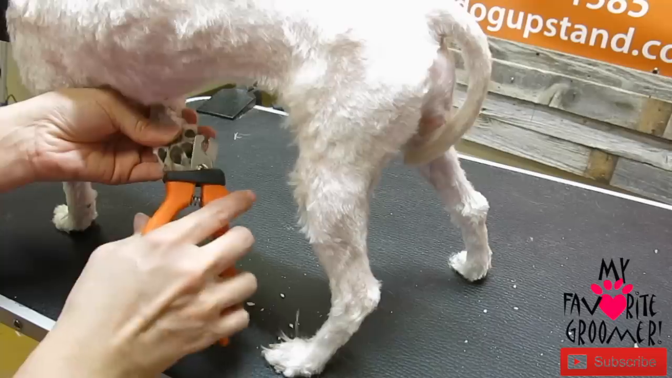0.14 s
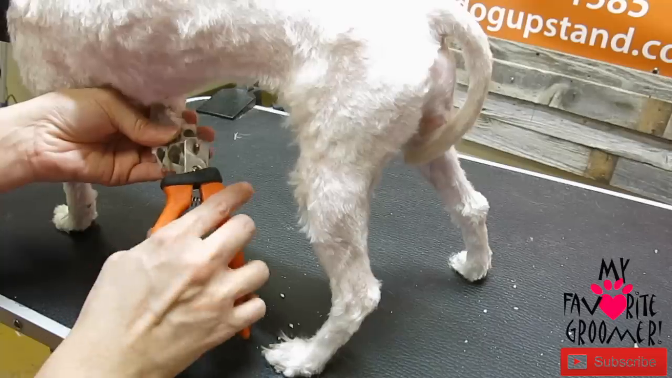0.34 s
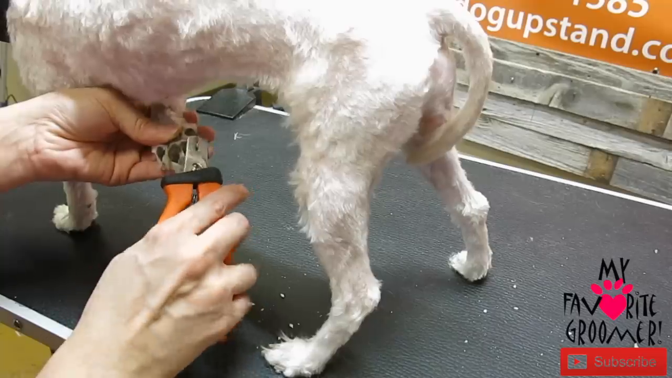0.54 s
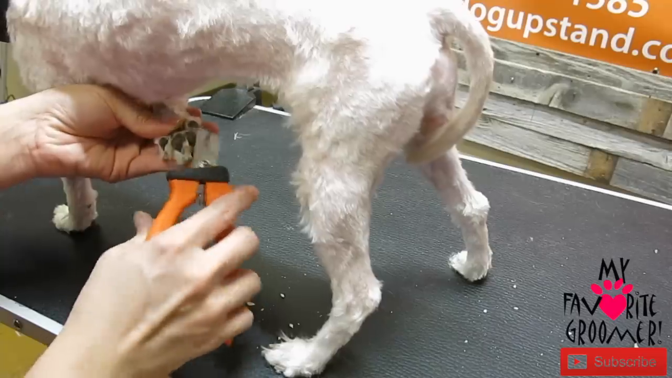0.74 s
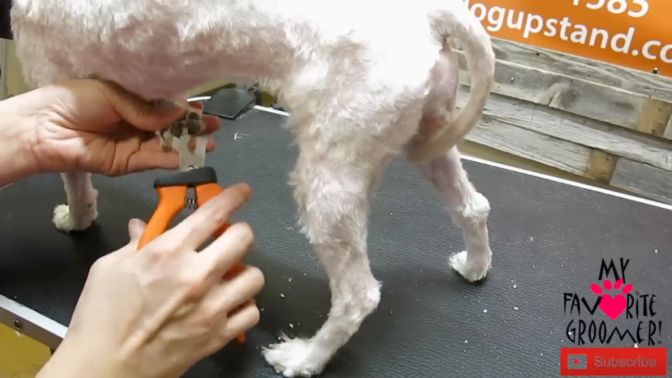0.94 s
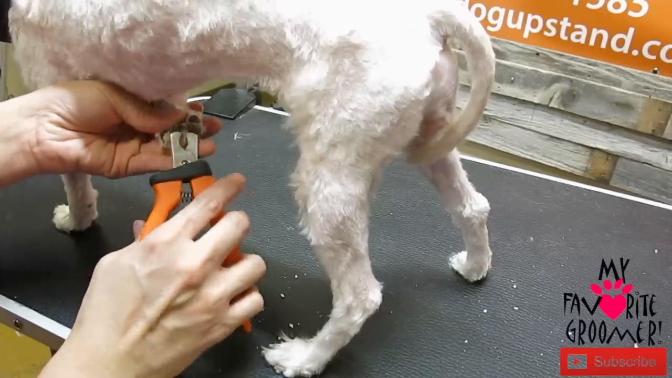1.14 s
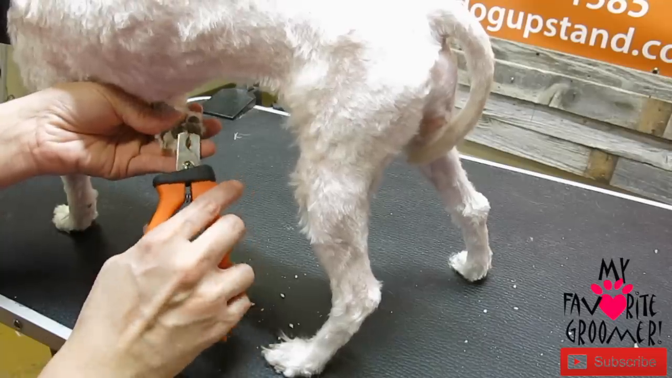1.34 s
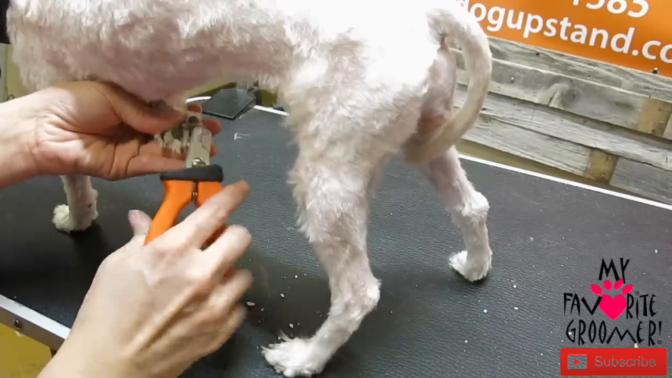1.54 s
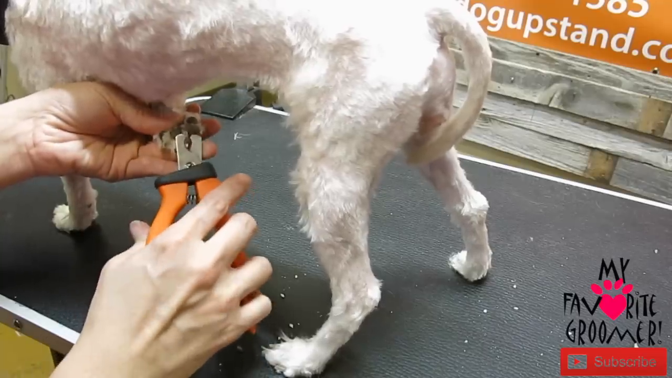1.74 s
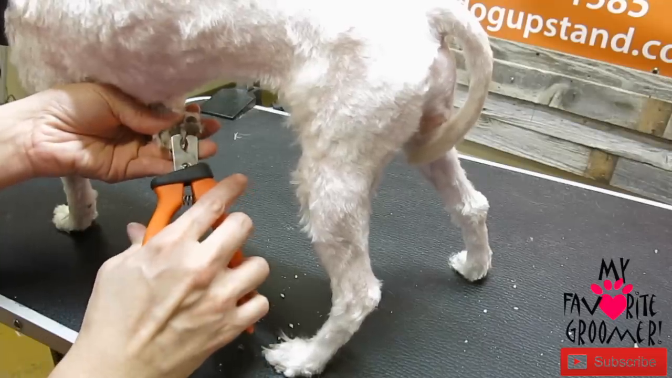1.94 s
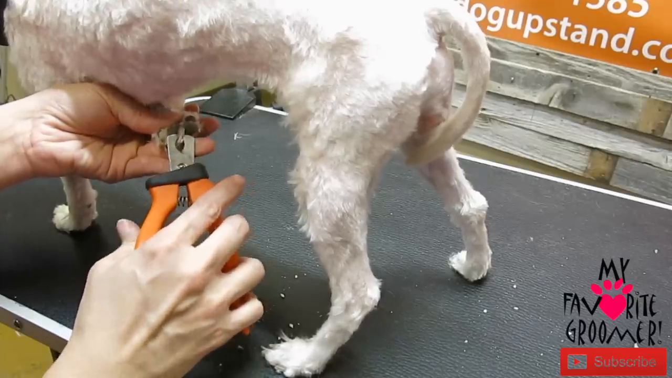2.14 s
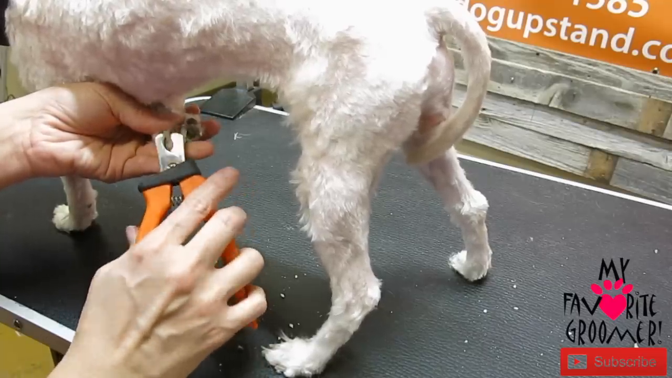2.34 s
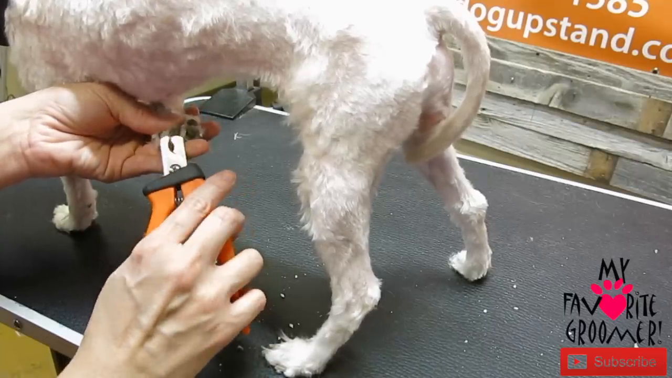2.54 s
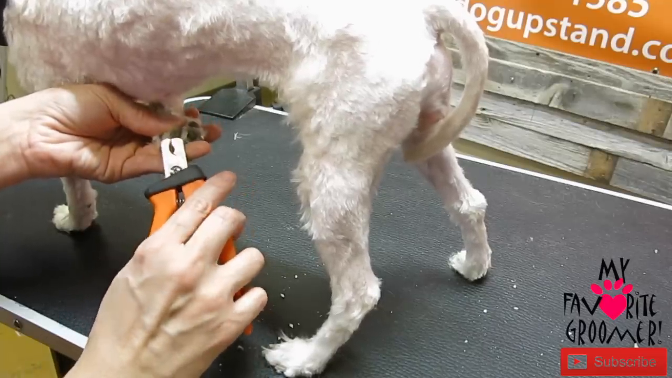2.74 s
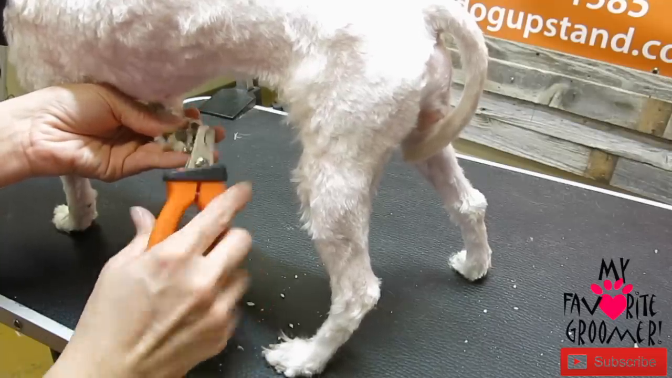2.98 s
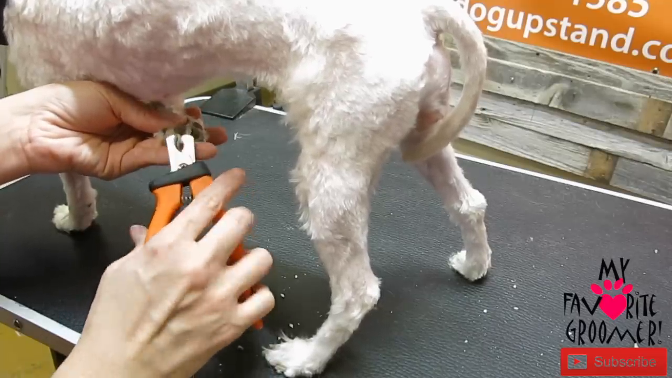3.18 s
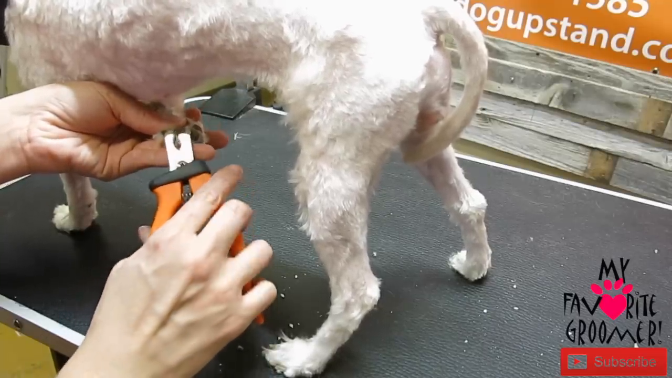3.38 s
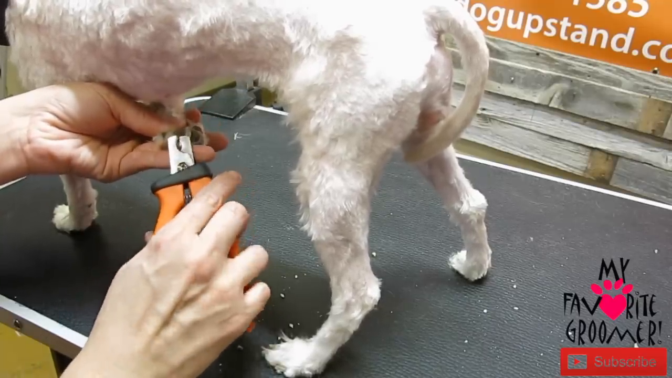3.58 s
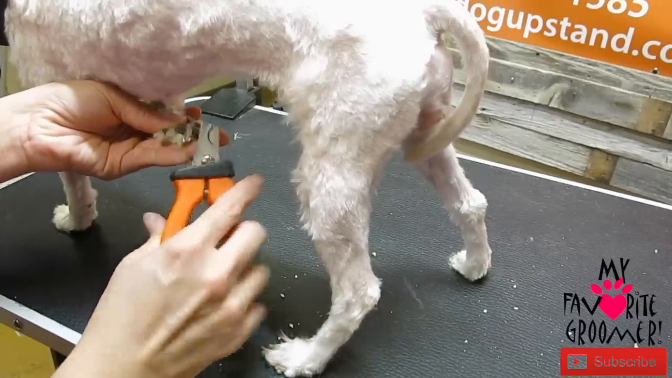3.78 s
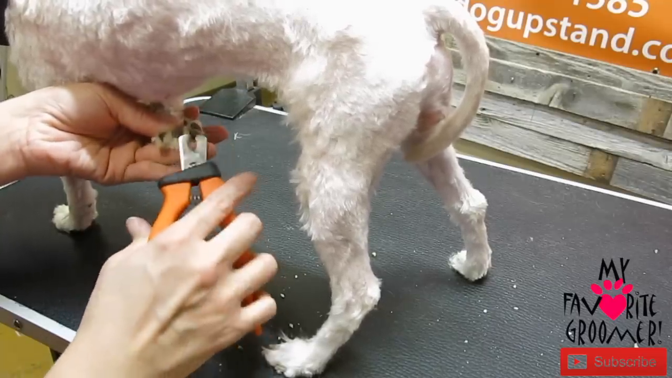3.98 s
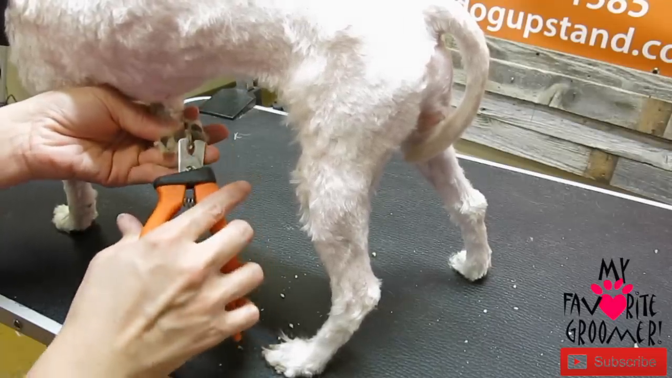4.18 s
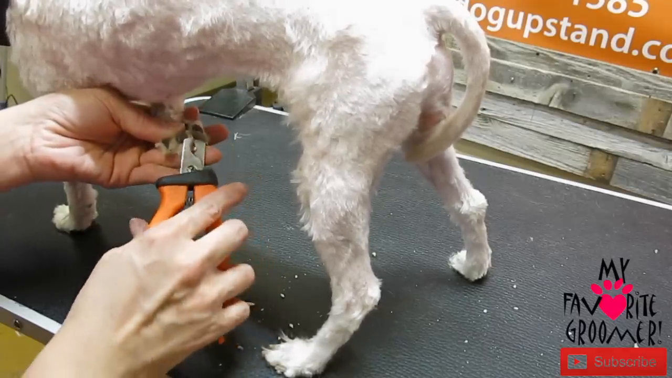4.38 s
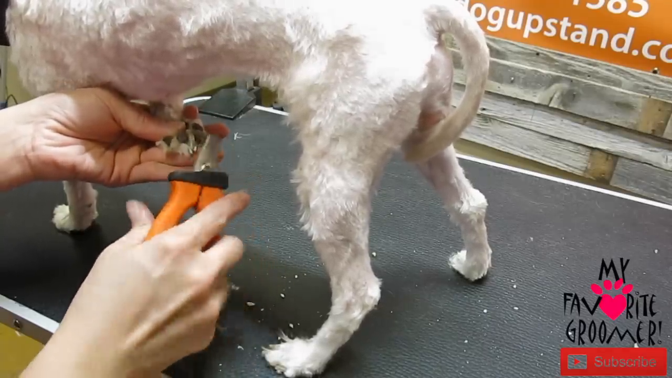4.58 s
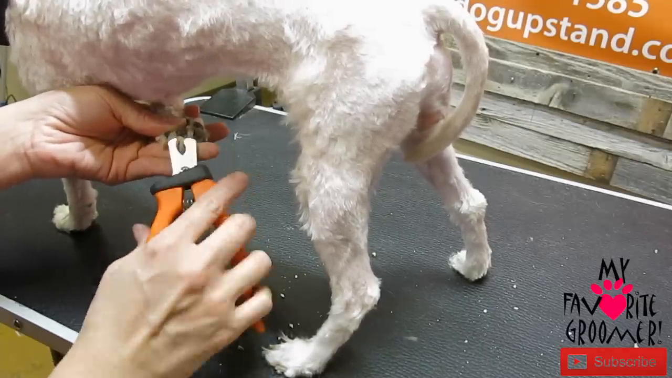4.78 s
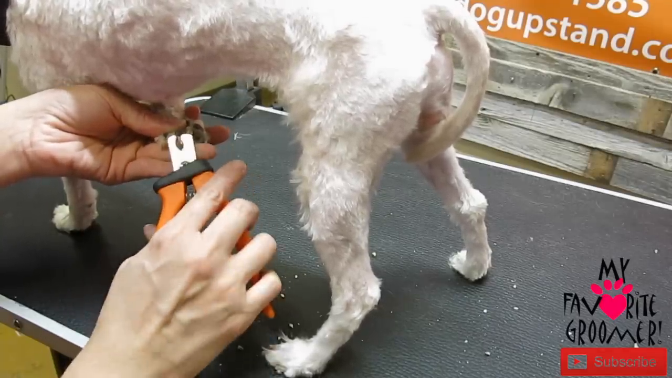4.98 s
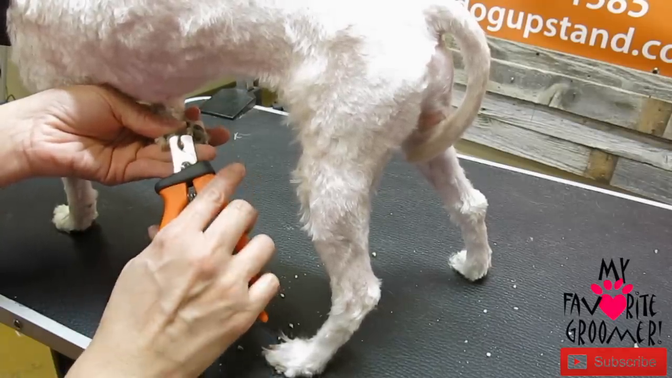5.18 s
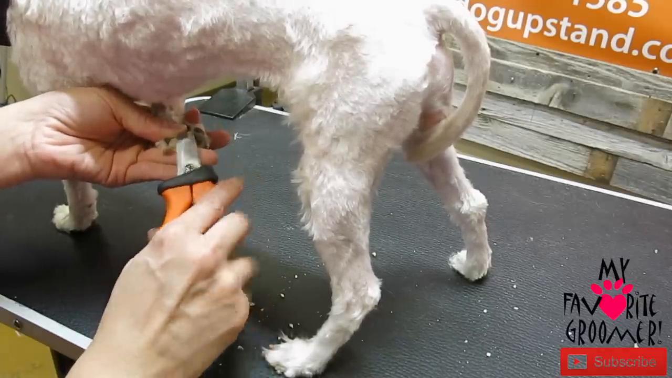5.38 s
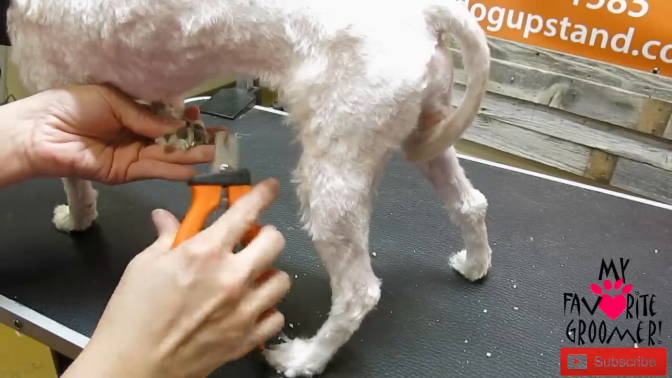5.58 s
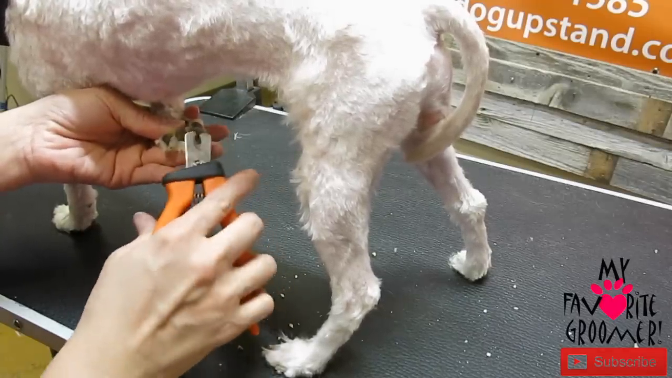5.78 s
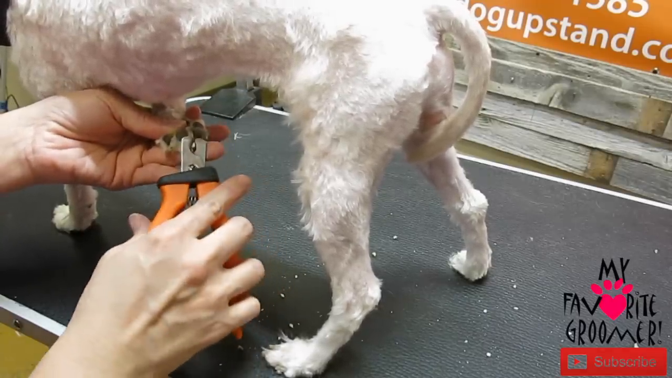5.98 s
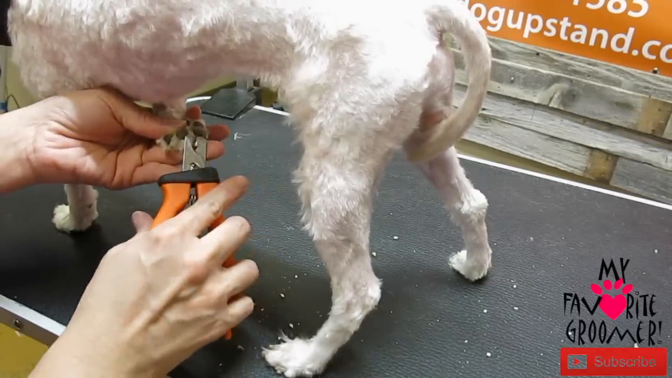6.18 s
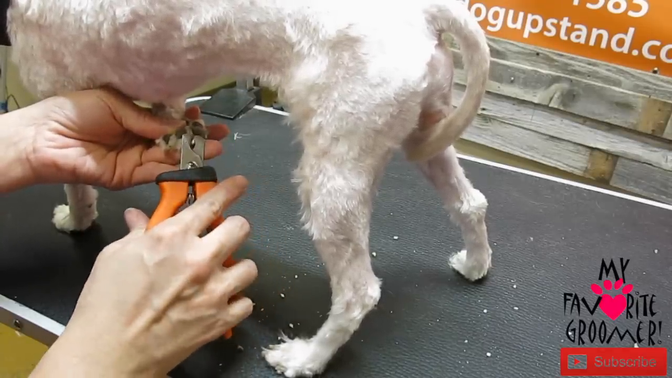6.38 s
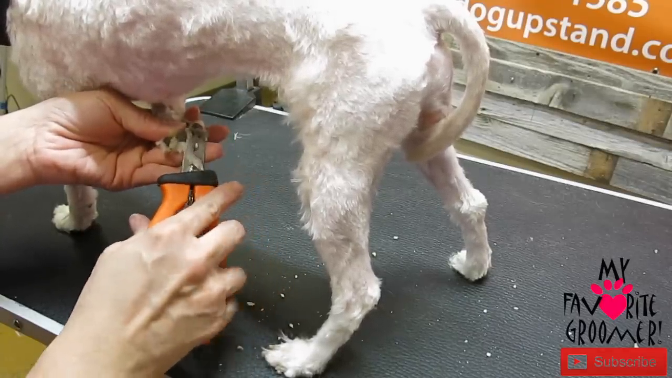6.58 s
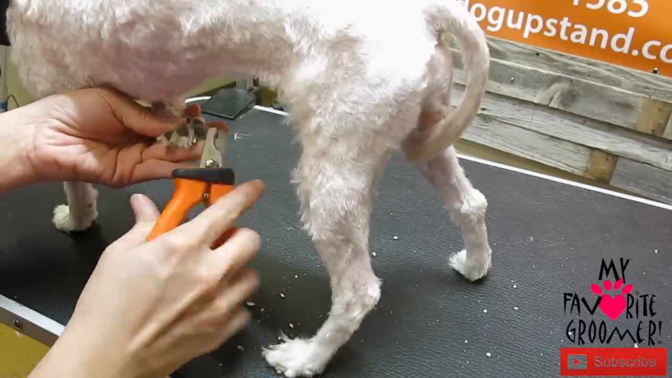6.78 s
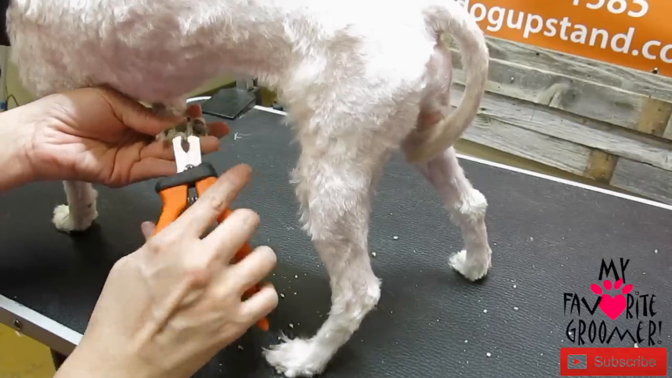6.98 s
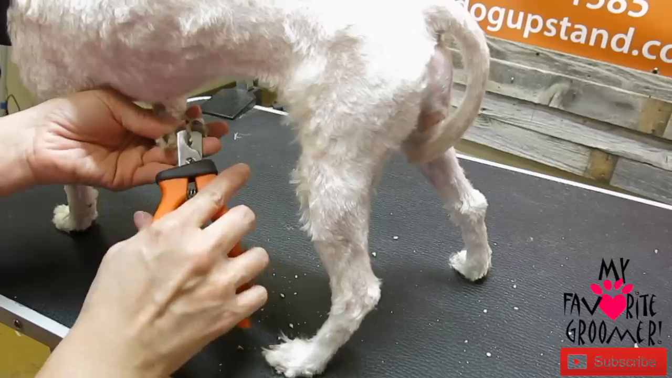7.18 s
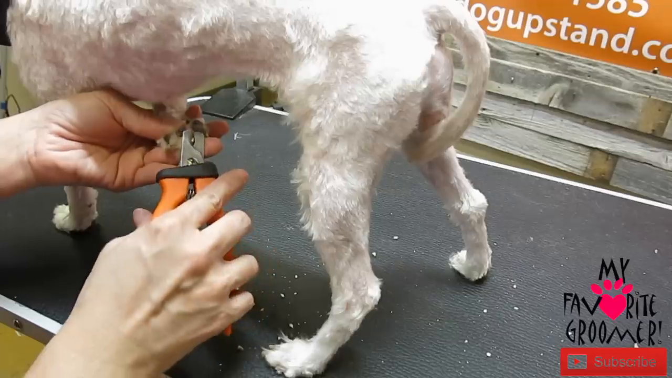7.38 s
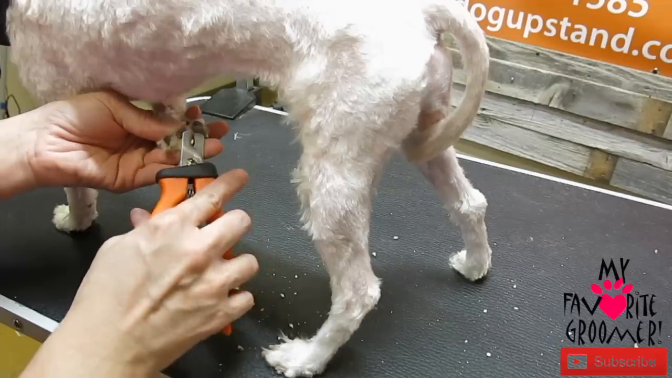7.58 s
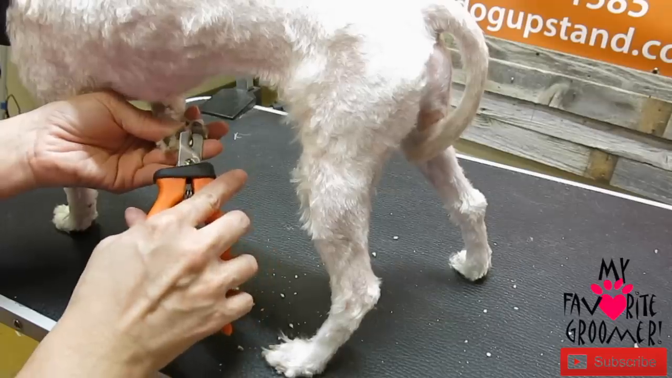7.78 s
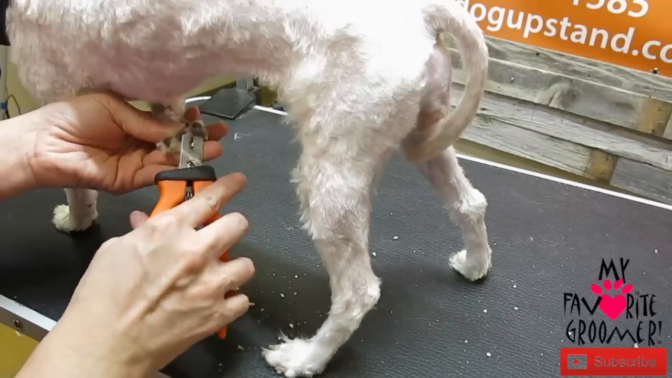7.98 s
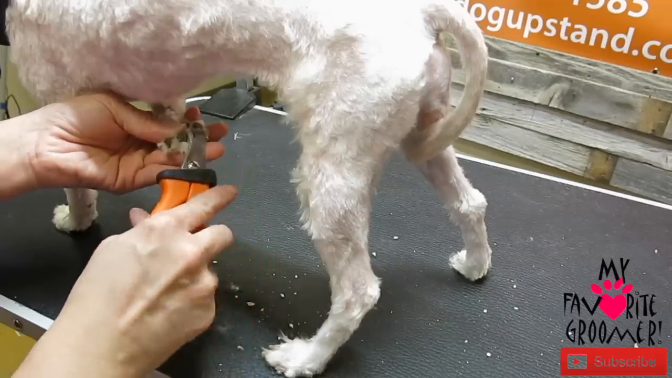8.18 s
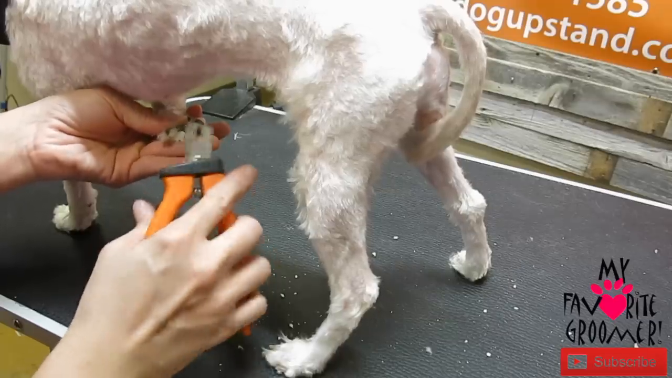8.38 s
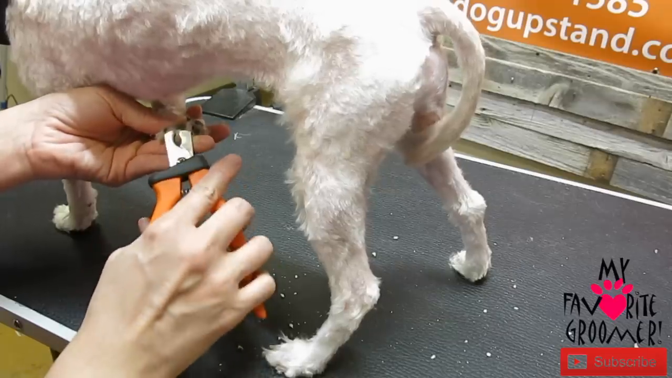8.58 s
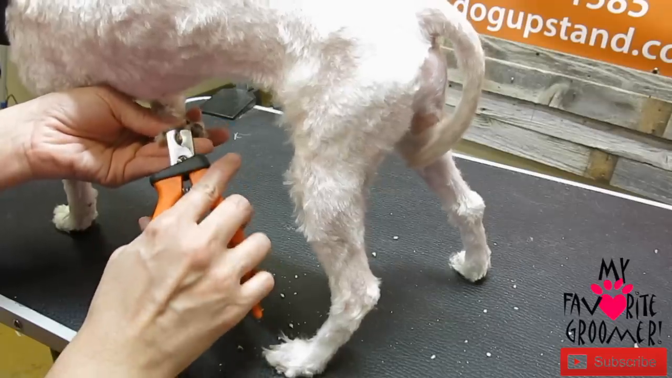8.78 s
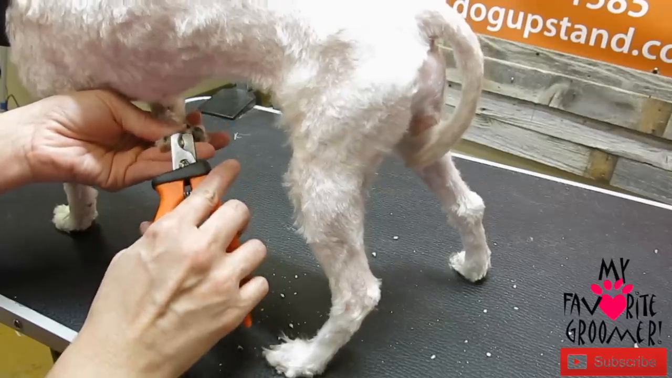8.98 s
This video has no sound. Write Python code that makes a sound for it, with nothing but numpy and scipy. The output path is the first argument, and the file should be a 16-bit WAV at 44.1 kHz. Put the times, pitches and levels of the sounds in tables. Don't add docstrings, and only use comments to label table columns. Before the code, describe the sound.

A close stereo microphone in a small, hard-walled room hears steel plier clippers cutting a dog's nails. A snap lands immediately at 0 s, then a softer double click at 0.6, a firm one at 1.5, the loudest and brightest crack at 2.9, a firm snap with a hard handle knock at 3.7, a duller double knock at 4.5, then snaps at 5.5, 6.7 and a fainter crack with a clear blade clap at 8.2. Tiny creaks lead into cuts; spring ticks follow about a quarter second later. A barely audible dull scrape passes near 7. Each hit has a small thud and short room ring. Underneath, mains hum, a slowly rising motor tone strongest near 1.4, 3.3 and 5.8, intermittent low drone, muffled vehicles swelling near 0.9 and 3.3, and soft ventilation continue to 9 s, ducking after snaps and creeping back.

```python
import sys
import numpy as np
from scipy import signal
from scipy.fft import rfft, irfft, next_fast_len
from scipy.io import wavfile
from scipy.ndimage import uniform_filter1d

SR = 44100
rng = np.random.default_rng(int(sys.argv[2]) if len(sys.argv) > 2 else 0)


def unload_audio(sound):
    columns = np.transpose(np.atleast_2d(sound))
    steps = np.round(np.clip(columns, -1, 1) * 32767)
    wavfile.write(sys.argv[1], SR, steps.astype(np.int16))


def linear_from_db(decibels):
    return 10 ** (np.asarray(decibels, float) / 20)


N = 398223

# t/s, tone level/dB
MOTOR_LOAD = [(0, -54), (.9, -58.5), (1.2, -44.5), (1.45, -42), (1.7, -53), (2.3, -63), (2.8, -55.5),
              (3.3, -39), (4.3, -49), (5.2, -50), (5.8, -40), (6.6, -47), (7.2, -50), (8.1, -49),
              (9.03, -53)]


def clippers(unlike=0.091, crest_db=7.0, lag_s=.000024):
    # f/Hz, width/Hz, level/dB
    nail_modes = [(1377, 680, -9), (1880, 580, 0.5), (2690, 730, -4)]
    # f/Hz, width/Hz, level/dB
    handle_modes = [(3800, 1700, -12), (4620, 450, 0.5), (5150, 760, -0.5), (6270, 1600, -1.5),
                    (7996, 1000, -2)]
    # f/Hz, width/Hz, level/dB
    blade_modes = [(8900, 820, -12), (9610, 1200, -1.5), (10630, 490, 1), (11650, 1200, -1),
                   (13500, 1500, -5.5), (14950, 1500, -8)]
    # grind share/0-1, grind time/s, level into the room/dB
    strikes = [(0.7, 0.001, 1.5), (0.4, 0.00088, 3), (0.2, 0.00092, -0.5)]
    sway_db = 1.2
    faint_db, faint_drier_db = -33, -4
    length = 400

    rows, span = contacts(), np.arange(length)
    pans_db = np.clip(sway_db * rng.standard_normal(len(rows)), -3, 3)
    near, spread = np.zeros((2, N + length)), np.zeros(N + length)
    rough = rng.standard_normal((len(rows), 9, length))
    knock = 1. * (span == 2)
    for part, modes in enumerate([nail_modes, handle_modes, blade_modes]):
        grind, grind_s, room_db = strikes[part]
        shared = rough[:, part, None]
        own = rough[:, 3 + 2 * part:5 + 2 * part]
        friction = grind * (shared + unlike * own) * np.exp(-span / SR / grind_s)
        rings = resonate(knock + friction, modes)
        rings /= np.abs(rings).max(axis=2, keepdims=True)
        clean = resonate(knock, modes)
        clean *= linear_from_db(room_db) / np.abs(clean).max()
        for (s, *levels_db), ring, pan_db in zip(rows, rings, pans_db):
            at = round(s * SR)
            gain = linear_from_db(levels_db[part] + crest_db)
            near[:, at:at + length] += gain * ring * linear_from_db(np.array([[.5], [-.5]]) * pan_db)
            drier_db = faint_drier_db * (levels_db[1] < faint_db)
            spread[at:at + length] += gain * clean * linear_from_db(drier_db)

    size = next_fast_len(N + length)
    hz = np.arange(size // 2 + 1) * SR / size
    turn = np.exp(-1j * np.pi * hz * lag_s * np.array([[1], [-1]]))
    return irfft(rfft(near, size) * turn, size)[:, :N], spread[None, :N]


def contacts():
    # t/s, level/dB, brightness/dB, thud f/Hz
    cracks = [
        (.0061, -20, 0, 700),
        (.6263, -25, 0.5, 690),
        (1.4839, -16, 0.5, 500),
        (2.9434, -9, 3.5, 600),
        (3.7042, -14.5, 0, 500),
        (4.5309, -18, -1.5, 550),
        (5.4607, -16, -1, 716),
        (6.6835, -18, -1.5, 454),
        (8.1794, -24, -4, 700),
    ]
    # t/s, level/dB, brightness/dB
    claps = [(.0216, -15, 0.088), (.6525, -18.5, 1.6), (1.4866, -13, 0.37), (2.9462, -22.5, 0),
             (3.7078, -18, 0.13), (5.4636, -17.5, 2.4), (6.6863, -16, 1), (8.1868, -16, 0)]
    # t/s, level/dB, brightness/dB
    bounces = [
        (.0135, -28.5, 10),
        (.6285, -25.5, 1),
        (3.7119, -16, 1.5),
        (4.534, -18.5, 3),
        (4.5378, -19, -5.5),
    ]
    # t/s, level/dB, brightness/dB
    creaks = [(.5837, -48.5, -4), (.6226, -42.5, -6), (1.4268, -52, -2), (1.449, -58, -1), (1.4588, -45, 0),
              (2.8557, -45.5, -3), (2.874, -55.5, 7), (2.9132, -56, 8.5), (3.677, -52, 6),
              (4.4751, -56, -3), (4.4876, -38, -1), (4.494, -42, -5), (4.4989, -42.5, 5), (4.507, -39.5, 4),
              (4.522, -54, -8), (5.3798, -55, 5), (5.397, -54.5, 5.5), (5.414, -53.5, 9),
              (5.4464, -44.5, -0.5), (6.6746, -44, 5.5), (8.1487, -52, 5), (8.161, -48, 3.5)]
    # t/s, level/dB, brightness/dB
    springs = [(.2849, -46.5, 9.5), (.307, -63, 8), (1.7654, -50.5, 2), (2.0338, -56, 0), (2.258, -56, 3),
               (3.1674, -39, -2.5), (3.2404, -47.5, 1), (3.285, -64, -4), (3.2914, -61.5, -5),
               (3.8903, -40.5, 5.5), (3.9936, -60, 8), (4.701, -57, 2), (4.7258, -42, 2),
               (4.9147, -57.5, 1), (5.698, -41, 3.5), (6.8816, -50, -0.5), (8.3672, -57.5, 8),
               (8.3802, -45.5, -1.5), (8.3883, -54, -4), (9.0048, -56, -8.5)]
    # t/s, level/dB, brightness/dB
    taps = [(.6087, -52, 6), (3.591, -62, -1.5), (3.6584, -58.5, -5), (4.3582, -55.5, 0),
            (6.128, -63.5, -2), (6.4515, -69, 0), (3.8903, -49, -4), (5.426, -59, 3.5),
            (8.1875, -34.5, -5.5)]
    # nail/dB, blade/dB, thud/dB, thud f/Hz
    crack = (-11.5, -0.5, -9.5, 563)
    clap = (-13, 10, -21.5, 602.5)
    bounce = (-10, 0, -19, 701)
    creak = (-9.5, 2.5, -27, 901)
    spring = (-9.5, 0, 0.5, 1180)
    tap = (8, -6, -31.5, 897.5)
    nail_yields = .3

    kinds = [(cracks, crack), (claps, clap), (bounces, bounce), (creaks, creak), (springs, spring), (taps, tap)]
    rows = []
    for events, (nail_db, blade_db, thud_db, usual_hz) in kinds:
        for s, db, bright_db, *own_hz in events:
            nail = db + nail_db - nail_yields * bright_db
            blade = db + blade_db + bright_db
            thud = db + thud_db - bright_db
            thud_hz = own_hz[0] if own_hz else usual_hz
            rows.append((s, nail, db, blade, thud, thud_hz))
    return np.array(rows)


def thuds(width=.7, scatter=0.026):
    length = 1000
    out, rows = np.zeros(N + length), contacts()
    knock = 1. * (np.arange(length) == 0)
    for s, *_, db, hz in rows:
        hz = hz * np.exp(scatter * rng.standard_normal())
        ring = resonate(knock, [(hz, width * hz, 0)])
        at = round(s * SR)
        out[at:at + length] += linear_from_db(db) * ring / np.abs(ring).max()
    return out[:N]


def scrape():
    # f/Hz, width/Hz, level/dB
    body = [(875, 40, 1), (1167, 120, -5), (1330, 80, -4.5)]
    stroke = hold(6.9, .2, .03)
    return stroke * linear_from_db(-61.5 + 2 * drift(30.)) * rms_one(resonate(rng.standard_normal(N), body))


def room(x, smear_s=0.0005, wall_cut_hz=11000, build_s=0.0027, start_s=0.0085, alike_hz=2500):
    # delay/s, left level/dB, right level/dB
    echoes = [(.0059, -14, -13), (.0067, -13, -12), (.0077, -8, -8), (.0092, -13, -14), (.0109, -10, -10),
              (.0128, -14, -13), (.0155, -17, -17)]
    # f/Hz, t60/s, level/dB
    reverb = [(400, .25, -42.5), (800, 0.36, -28.5), (1718, .22, -35.5), (3054, 0.28, -34),
              (5900, .28, -34.5), (11000, .25, -35.5)]
    t = np.arange(SR // 2) / SR
    response = np.zeros((2, len(t)))
    for delay_s, *side_db in echoes:
        envelope = np.exp(-np.abs(t - delay_s) / smear_s) * (t > delay_s)
        burst = rng.standard_normal((2, len(t))) * envelope
        response += linear_from_db(side_db)[:, None] * burst / np.linalg.norm(burst, axis=1, keepdims=True)
    response = signal.lfilter(*signal.butter(1, wall_cut_hz, fs=SR), response)

    middle = np.sqrt(2) * response.mean(axis=0)
    response = middle + signal.lfilter(*signal.butter(2, alike_hz, "high", fs=SR), response - middle)

    build = 1 - np.exp(-np.maximum(t - start_s, 0) / build_s)
    for hz, t60, db in reverb:
        band = signal.butter(2, [hz / np.sqrt(2), hz * np.sqrt(2)], "band", fs=SR, output="sos")
        noise = signal.sosfilt(band, rng.standard_normal((2, len(t))))
        response += linear_from_db(db - 60 * t / t60) * build * noise
    return signal.fftconvolve(x, response, axes=1)[:, :N]


def motor(start_hz=119.1, gain_hz_per_s=2.9, ease_hz_per_s2=.09):
    # f/Hz, level/dB per Hz
    rumble = [(18, -30), (35, -18.5), (55, -11), (80, -8.5), (105, 3.5), (160, 5), (230, -8.5),
              (400, -52.5)]
    t, (tone_db,) = np.arange(N) / SR, in_time(MOTOR_LOAD)
    hum = tone(start_hz + gain_hz_per_s * t - ease_hz_per_s2 * t ** 2, tone_db)
    rumble_db = -55 + .2 * (tone_db - tone_db.mean()) + 4 * drift(1.5)
    return hum + linear_from_db(rumble_db) * coloured(rumble)[0]


def drone():
    # start t/s, length/s, f/Hz, level/dB, more for each higher partial/dB
    spells = [
        (0, .7, 84.3, -57, 0.5),
        (0.805, .75, 87.5, -61, -4.5),
        (1.75, .75, 87.5, -57, 0),
        (4.1, .85, 81.4, -55.5, 3.5),
        (5.25, .5, 80.5, -54.5, 2.5),
        (5.897, .75, 86.6, -59.5, 4.5),
    ]
    partials_db = [-1, 1.5, -10.5]
    t, out = np.arange(N) / SR, np.zeros(N)
    for k, partial_db in enumerate(partials_db):
        unsteady = 0.94 + .5 * drift(2.2)
        for s, length_s, hz, db, tilt_db in spells:
            level = linear_from_db(db + partial_db + (k - 0.5) * tilt_db) * hold(s, length_s, .08)
            out += np.sqrt(2) * level * unsteady * np.sin(2 * np.pi * (k + 1) * hz * t)
    return out


def mains():
    # f/Hz, level/dB rms
    hum = [(60.1, -69), (120.3, -55.5)]
    return sum(tone(hz, db, wobble_hz=.05, flutter_db=-1.3) for hz, db in hum)


def vehicles():
    # nearest at t/s, level there/dB rms, time until 1.41 times as far (3 dB fainter)/s
    passes = [
        (.85, -62.5, .15),
        (3.3, -56, .15),
        (5.0, -69.5, 1.5),
    ]
    # f/Hz, level/dB per Hz
    traffic_tone = [(15, -45), (30, -21.5), (54, 0.5), (66, 0), (90, -23.5), (200, -60.5)]
    t = np.arange(N) / SR
    swell = sum(linear_from_db(db) / np.hypot(1, (t - s) / far_s) for s, db, far_s in passes)
    return swell * coloured(traffic_tone)[0]


def air():
    # f/Hz, level/dB per Hz
    mid_colour = [(18, -23.5), (100, -7.5), (200, 1.5), (300, -0.5), (460, -6), (700, -9), (1500, -14.5),
                  (2900, -22), (6000, -24), (17000, -38)]
    # f/Hz, level/dB per Hz
    side_colour = [(18, -77), (110, -47), (165, -22.5), (220, -8.5), (430, -0.5), (700, 1), (1860, -8),
                   (2830, -19), (8300, -26), (17000, -38.5)]
    mid = linear_from_db(-56 + 0.27 * drift(9.0)) * coloured(mid_colour)
    side = linear_from_db(-55.5 + .8 * drift(3.)) * coloured(side_colour)
    load_db, = in_time(MOTOR_LOAD)
    rise_db = 0.13 * (np.arange(N) - N / 2) / SR
    swell_db = rise_db + .05 * (load_db - load_db.mean())
    return linear_from_db(swell_db) * (mid + side * [[1], [-1]])


def tone(hz, db, wobble_hz=0.21, flutter_db=1.0):
    phase = 2 * np.pi * (np.cumsum(hz + wobble_hz * drift(2.2)) / SR + rng.random())
    return np.sqrt(2) * linear_from_db(db + flutter_db * drift(5.5)) * np.sin(phase)


def resonate(x, modes):
    out = 0
    for k, (hz, width, db) in enumerate(modes):
        r = np.exp(-np.pi * width / SR)
        a = [1, -2 * r * np.cos(2 * np.pi * hz / SR), r * r]
        out = out + (-1) ** k * linear_from_db(db) * signal.lfilter([1 - r * r, 0, r * r - 1], a, x)
    return out


def hold(start_s, length_s, edge_s):
    t = np.arange(N) / SR
    return (np.tanh((t - start_s) / edge_s) - np.tanh((t - start_s - length_s) / edge_s)) / 2


def in_time(rows):
    s, *columns = np.transpose(rows)
    return [np.interp(np.arange(N) / SR, s, c) for c in columns]


def rms_one(x):
    return x / np.sqrt(np.mean(x ** 2) + 1e-20)


def coloured(spectrum, channels=1):
    size = next_fast_len(N)
    hz, db = np.transpose(spectrum)
    bins_hz = np.arange(size // 2 + 1) * SR / size
    gain = linear_from_db(np.interp(np.log(bins_hz + 1), np.log(hz), db))
    return rms_one(irfft(rfft(rng.standard_normal((channels, size))) * gain, size)[:, :N])


def drift(rate_hz):
    return coloured([(1, 0), (1 + rate_hz, -3), (1 + 10 * rate_hz, -40), (1 + 100 * rate_hz, -120)])[0]


def scene():
    near, spread = clippers()
    low = thuds()
    beyond_walls = motor() + drone() + mains() + vehicles()
    return near + low + scrape() + room(spread + low) + beyond_walls + air()


def gain_control(x, threshold_db=-24, slope=0.41, release_db_s=6, attack_s=0.012):
    power = uniform_filter1d(np.mean(x ** 2, axis=0), size=128, origin=63)
    level_db = 10 * np.log10(power + 1e-12)
    cut_db = slope * np.maximum(level_db - threshold_db, 0)
    climb = release_db_s * np.arange(N) / SR
    held_db = np.maximum.accumulate(cut_db + climb) - climb
    r = np.exp(-1 / (attack_s * SR))
    return x * linear_from_db(-signal.lfilter([1 - r], [1, -r], held_db))


def band_limit(x):
    return signal.sosfilt(signal.butter(12, 16800, fs=SR, output="sos"), x)


def record(dry):
    # f/Hz, level/dB per Hz
    hiss = [(18, -19.5), (500, 12.5), (3000, -11.5), (8000, -4), (17000, -9)]
    x = gain_control(dry) + linear_from_db(-68) * coloured(hiss, channels=2)
    low_pass = signal.cheby2(16, 45, 16900, fs=SR, output="sos")
    mix = signal.sosfilt(low_pass, np.clip(x, -1, 1))
    return band_limit(mix)


dry = scene()
out = record(dry)
unload_audio(out)
```